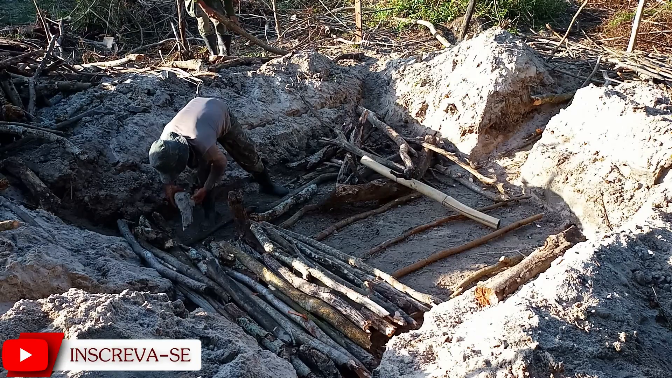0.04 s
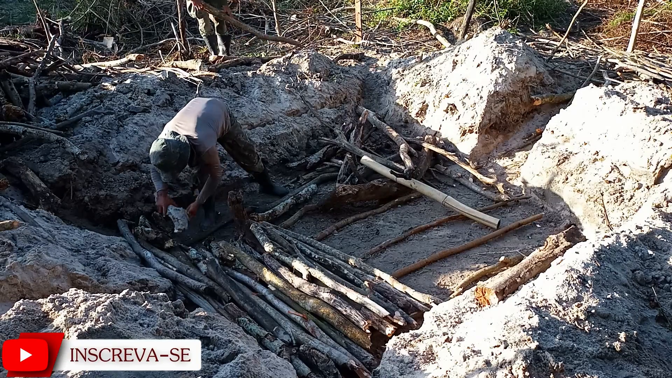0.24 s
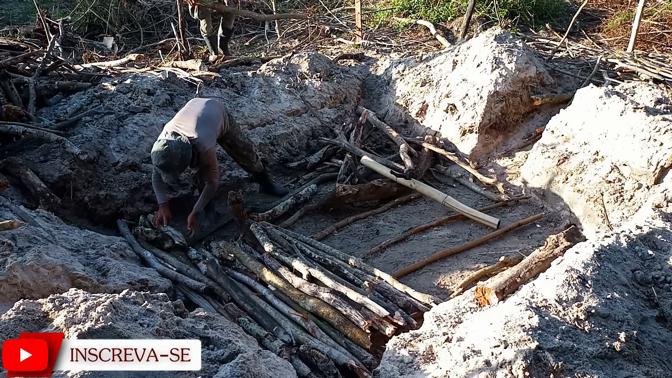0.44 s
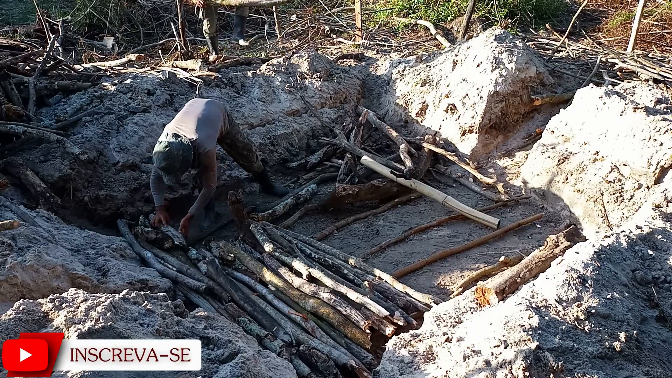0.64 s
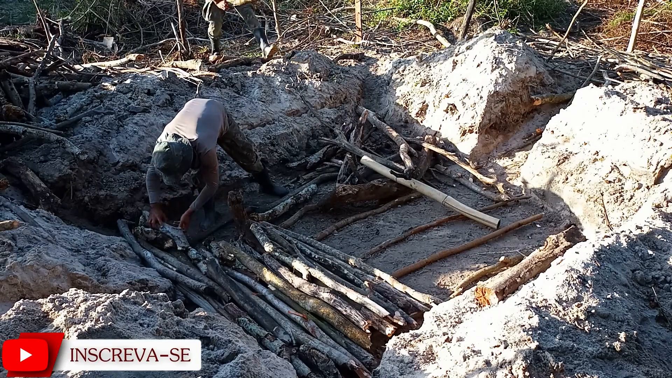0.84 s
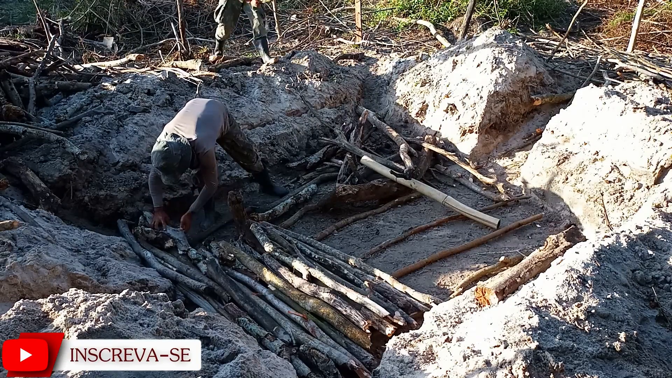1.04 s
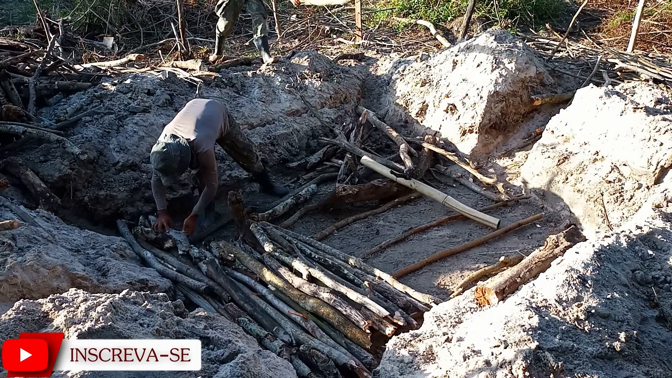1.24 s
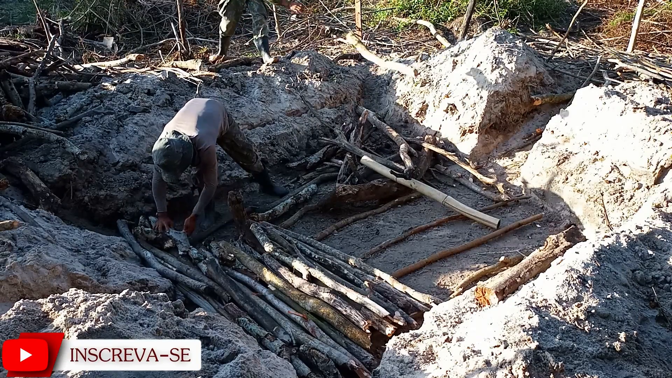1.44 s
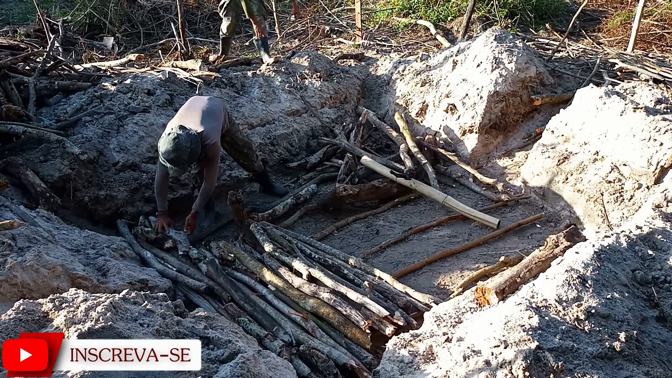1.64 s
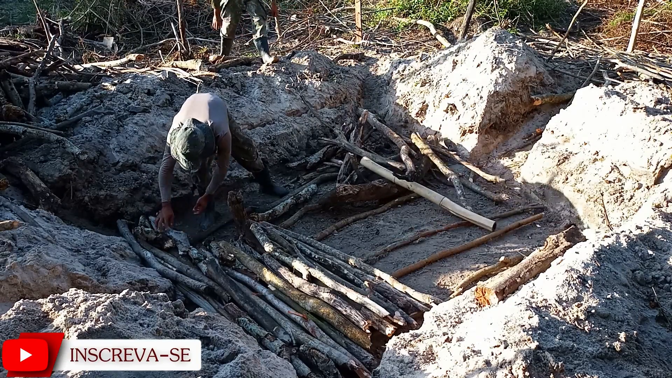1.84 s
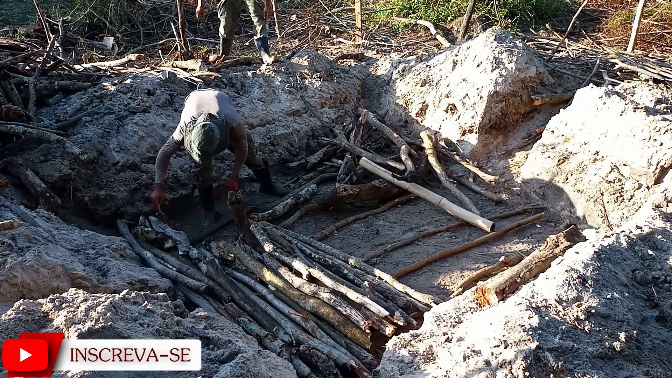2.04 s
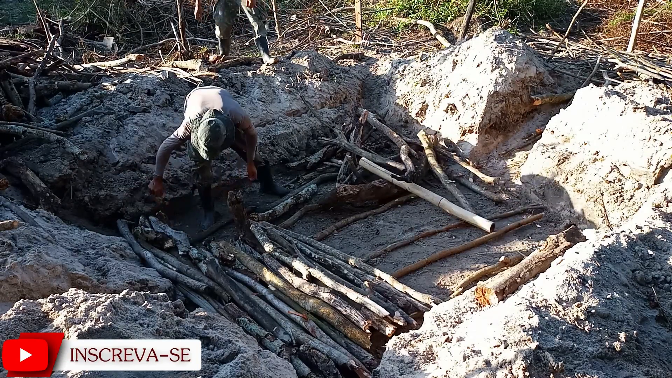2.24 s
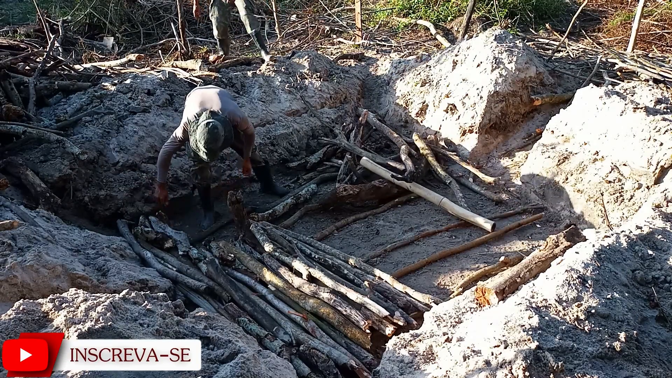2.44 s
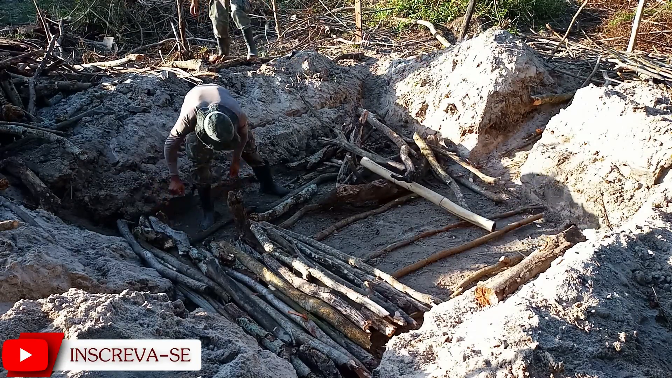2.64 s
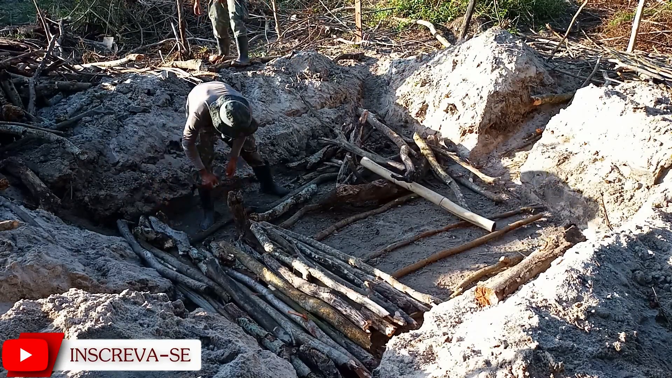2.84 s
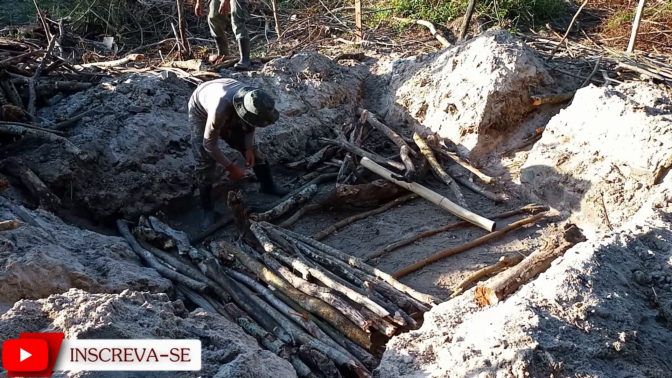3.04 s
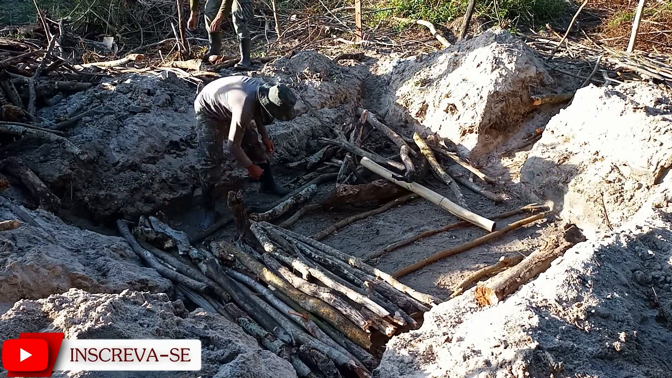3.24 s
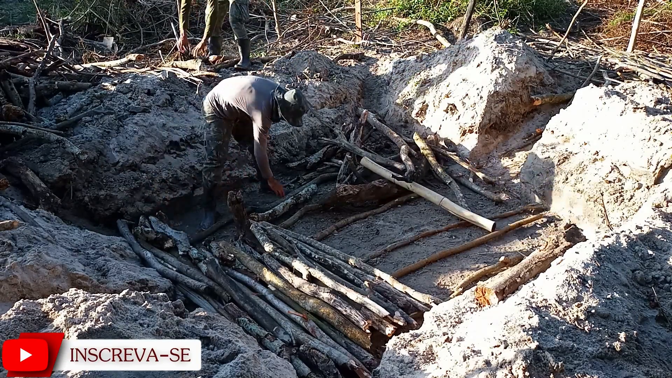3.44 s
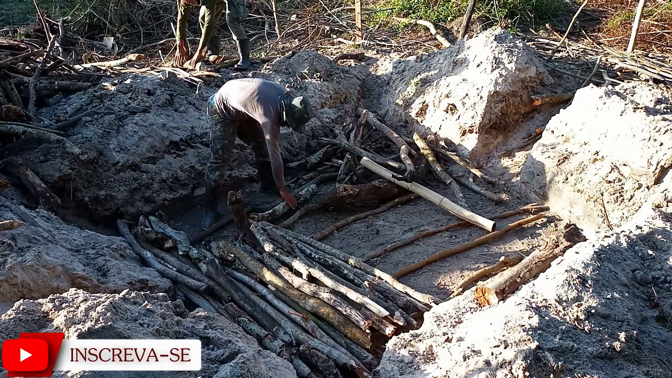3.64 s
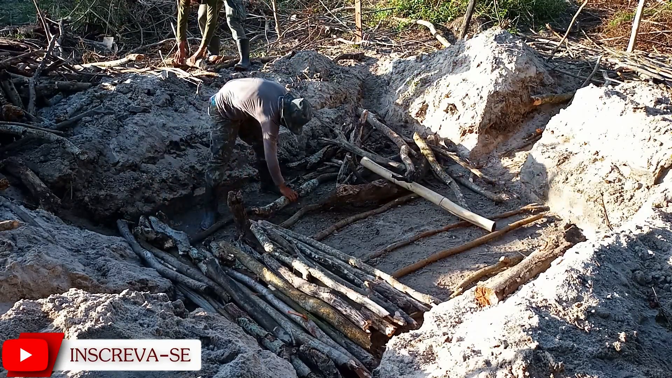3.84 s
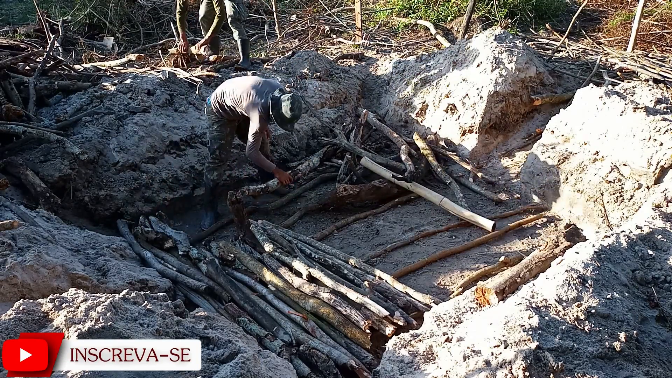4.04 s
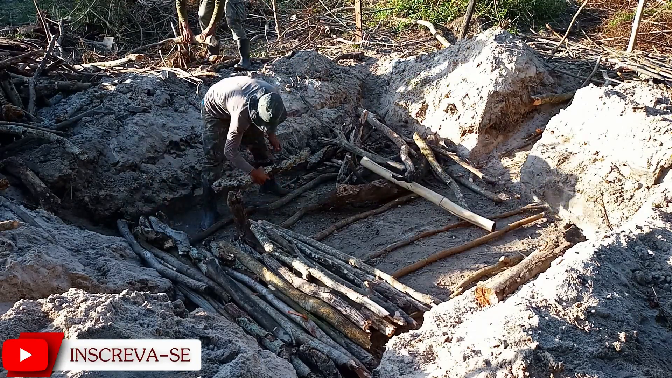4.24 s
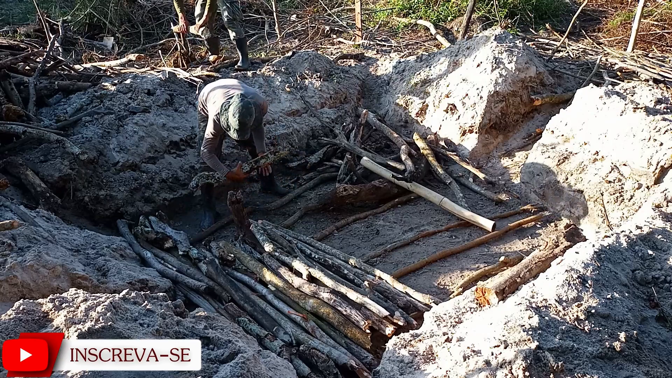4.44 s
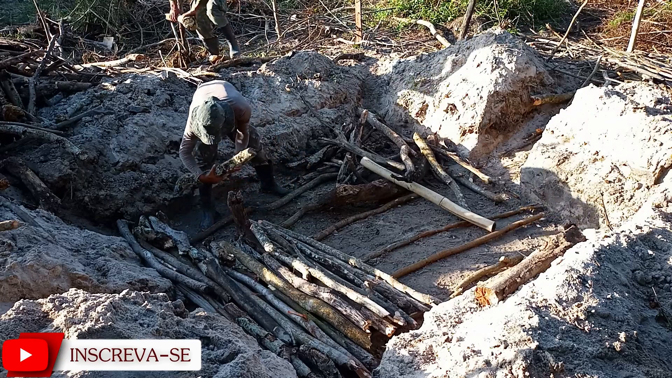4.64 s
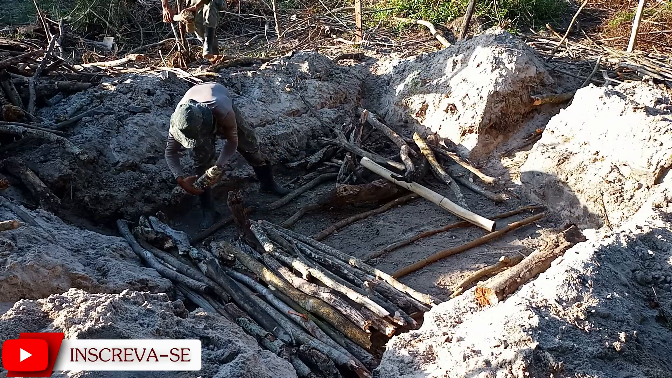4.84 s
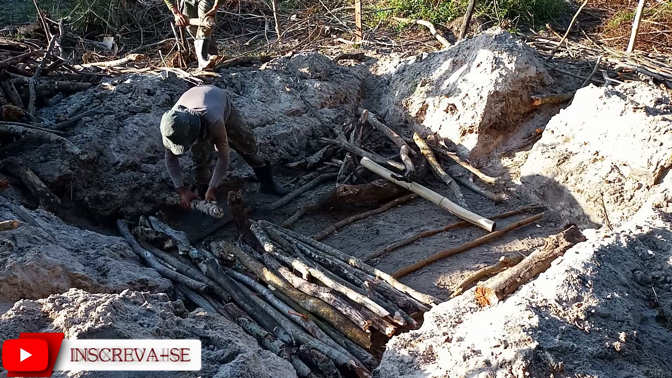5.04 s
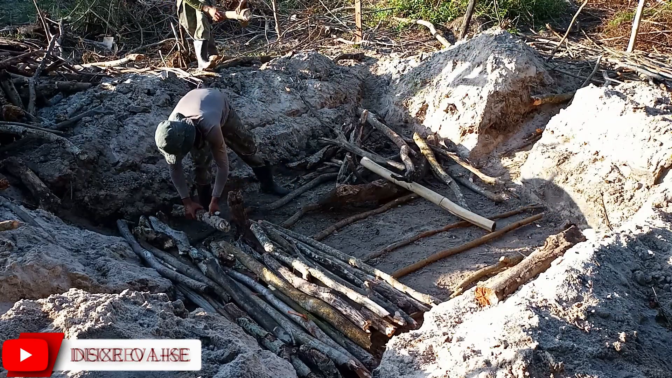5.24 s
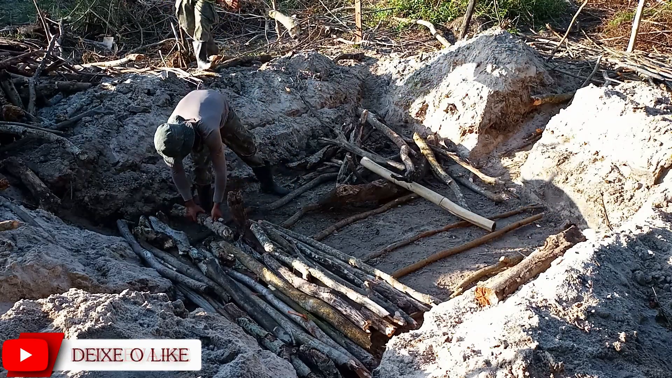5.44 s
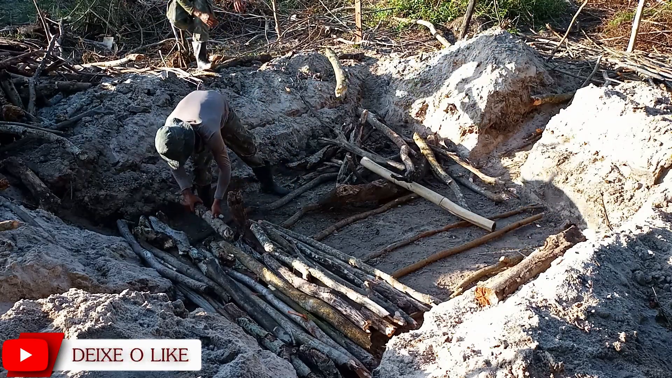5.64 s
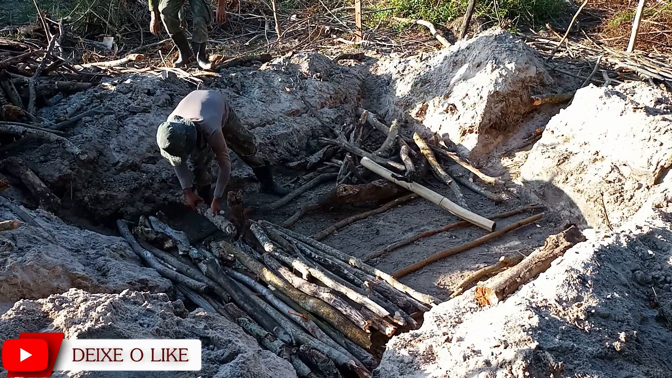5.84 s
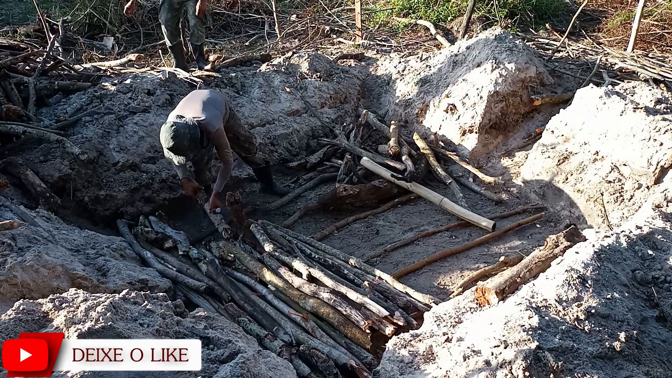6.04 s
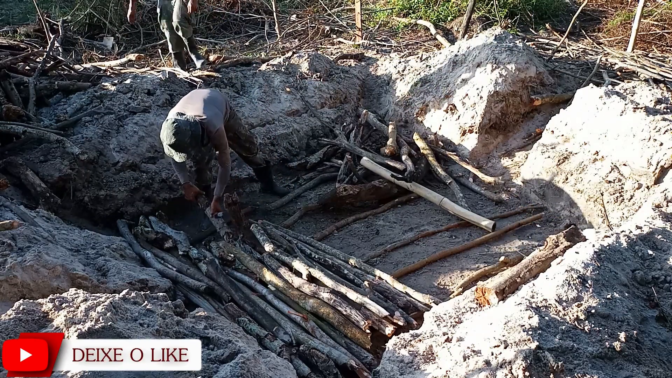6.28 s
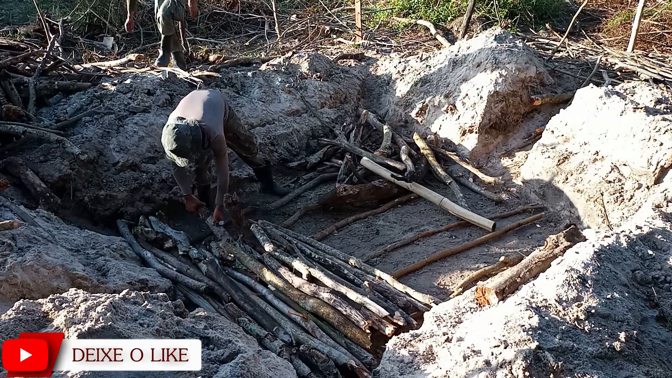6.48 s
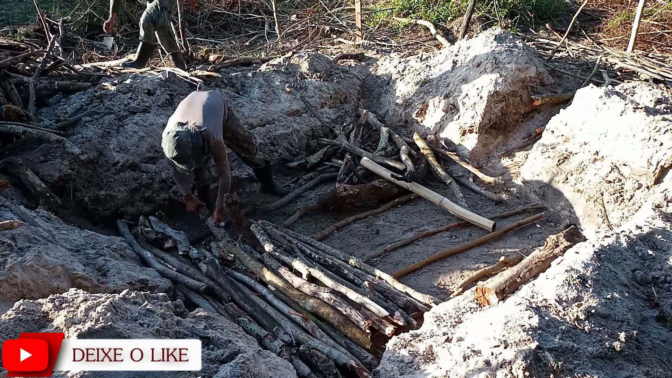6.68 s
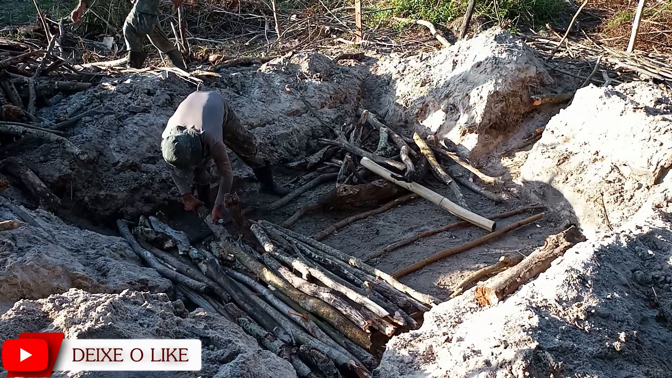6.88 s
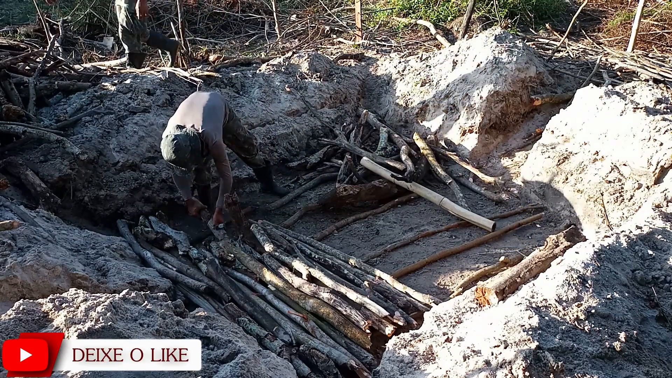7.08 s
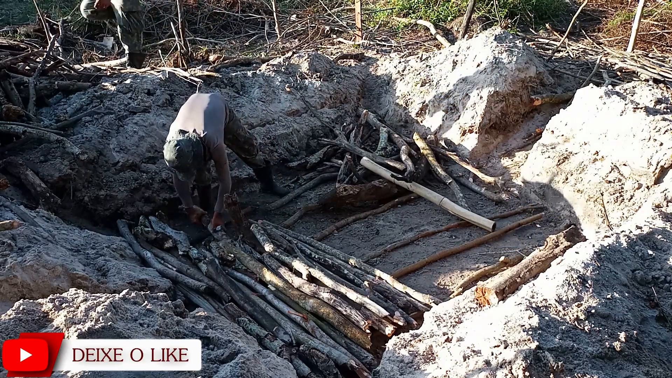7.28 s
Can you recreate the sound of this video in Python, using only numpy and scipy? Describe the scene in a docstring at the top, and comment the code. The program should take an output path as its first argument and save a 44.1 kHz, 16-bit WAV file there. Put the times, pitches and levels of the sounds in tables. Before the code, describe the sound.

Wood is piled by hand in two short, hollow clatters, between soft rustles and twig snaps, with faint birds behind.

```python
"""A faint scrape of bark over a far, low rush, then the first knock: firewood is stacked by hand in an
earth pit at the edge of a wood, a few metres away. Pieces knock, bounce and settle, each ringing in its
own modes, and the heavy ones thump the ground. Bark crunches at each contact and rustles as wood is
shifted; leaves and sand are trodden and dry twigs snap. The pit walls add a short wash and the trees a
faint echo. Small birds whistle through the foliage above a thin insect hiss."""
import sys
import numpy as np
from scipy import signal
from scipy.fft import rfft, irfft, next_fast_len
from scipy.io import wavfile
from scipy.ndimage import uniform_filter1d

SR = 44100
rng = np.random.default_rng(int(sys.argv[2]) if len(sys.argv) > 2 else 0)


def wrap_up_sound(samples):
    """Save the sound to the file named by the first command line argument, as 16-bit audio."""
    columns = np.atleast_2d(samples).T
    # keep every value between -1 and 1, then stretch to whole-number steps
    tamed = np.clip(columns, -1, 1)
    steps = np.round(tamed * 32767).astype(np.int16)
    wavfile.write(sys.argv[1], SR, steps)


N = 322371
TIME = np.arange(N) / SR

# modes of each piece of wood: f/Hz, level/dB, t60/s
WOOD_MODES = { "log": [(242, -7, 0.27), (295, -4.5, 0.18), (362, -4, 0.073), (451, -7, 0.087),
              (573, 1.5, 0.079), (621, 2, 0.062), (685, 0.5, 0.044), (780, -5.5, .055), (921, -4.5, 0.083),
              (1117, -7, 0.05), (1340, -7.5, 0.05), (1650, -11, 0.054), (1920, -7, 0.05),
              (2450, -9.5, .055)], "pile": [(234, -13.5, 0.083), (277.5, 1.5, 0.13), (383, 2, 0.09),
              (451, 2.5, 0.076), (523, 0.5, 0.05), (614, -1, 0.083), (750, -5.5, 0.067), (850, -4, 0.073),
              (1160, -11, 0.06), (1560, -15, 0.045)], "stump": [(345, -3, 0.15), (423, -6, 0.038),
              (487, 10, 0.069), (540, -6, 0.088), (960, -36, 0.035)], "billet": [(494, 0, 0.086),
              (678, -0.5, 0.074), (992, 2, 0.036), (1040, -9, 0.073), (1270, 4, 0.017), (1655, -6, 0.047),
              (2750, -16, 0.07), (3920, -5, 0.027), (4420, -37, .04)], "split": [(380, -3, 0.069),
              (587, -18, 0.049), (740, 2.5, 0.044), (940, 3.5, 0.039), (1194, -6, 0.069), (1570, -7, 0.055),
              (1813, -2, 0.024), (2400, -27, 0.013), (2630, -12, 0.029)], "stick": [(754, -2.5, 0.11),
              (1070, -7, 0.078), (1660, -9, 0.048), (1950, 9, 0.019), (2170, -20, 0.015), (2843, 7, 0.05),
              (3100, 2, 0.033), (4400, -21, 0.027), (4970, -18, 0.014), (5620, 18, 0.0053),
              (6130, -13, 0.033)], "stub": [(1135, 8, 0.045), (1246, 7, 0.066), (1624, 4, 0.044),
              (2030, -5, .025), (2600, 5, 0.022)], "branch": [(944, 1.5, 0.17), (1090, 0, 0.16),
              (1200, -1, 0.053), (1997, 5.5, 0.049), (2070, -6, 0.067), (3100, 3, 0.056), (4000, -17, .045),
              (4720, 1, 0.068), (5400, 6.5, 0.024), (6960, 1, 0.03)], }
# how each piece lies and what covers it: ring length/ratio, crack tilt/dB per octave, knock vs ring/dB
PIECES = {"log": (1, -0.39, -6), "pile": (1, 0, 0.5), "stump": (0.96, 0.87, -24),
          "billet": (0.54, -0.68, -11), "split": (0.71, -2.3, -6), "stick": (0.75, -2.6, -12.5),
          "stub": (0.83, -5, -22), "branch": (0.53, -1.8, -15.5)}
# wood meets wood: t/s, piece, ring level/dB, bark crack level/dB, crack decay/s
BLOWS = [ (0.4904, "billet", -47, -45.5, 0.0045), (0.495, "billet", -36.5, -36.5, 0.0071),
         (0.4982, "billet", -36, -36, 0.0018), (0.5006, "billet", -29.5, -54, .003),
         (0.524, "pile", -52, -64, .003), (0.937, "branch", -71, -54.5, 0.0017),
         (0.9534, "stick", -67, -52.5, 0.0076), (.982, "split", -48.5, -58, 0.0025),
         (1.1996, "stub", -43, -50.5, 0.0035), (1.344, "pile", -52, -59, .005),
         (1.352, "split", -47, -46.5, 0.0024), (1.357, "split", -32.5, -62, 0.0058),
         (1.7515, "stick", -24, -25.5, 0.0055), (1.7798, "log", -16.5, -35, 0.0073),
         (1.783, "split", -23.5, -25, 0.0053), (1.804, "log", -28.5, -29.5, 0.0075),
         (1.8133, "stub", -36, -32.5, 0.0054), (1.8232, "log", -22.5, -32.5, 0.0065),
         (1.826, "billet", -29, -28.5, 0.0051), (1.8342, "log", -22, -32.5, 0.0054),
         (1.841, "split", -35.5, -33.5, 0.0083), (1.863, "stub", -37, -36.5, 0.0039),
         (1.8825, "stick", -39, -39.5, 0.0062), (1.8898, "pile", -40.5, -50, .004),
         (1.897, "log", -51, -41.5, 0.0025), (1.934, "log", -52, -40.5, 0.014),
         (1.941, "stub", -60, -44.5, 0.0057), (1.951, "stick", -64.5, -53, 0.0048),
         (2.0355, "stub", -37.5, -45, 0.0038), (2.0943, "branch", -36.5, -43, 0.0033),
         (2.0981, "branch", -33.5, -38.5, 0.0064), (2.299, "pile", -68, -54, 0.0038),
         (5.462, "stump", -40.5, -73, .0034), (5.948, "pile", -40, -38, 0.005),
         (5.9544, "branch", -27, -23.5, 0.0063), (5.9728, "split", -26, -34.5, 0.0039),
         (5.9985, "pile", -35.5, -40.5, 0.0048), (6.002, "pile", -22, -50, 0.006),
         (6.0148, "pile", -27.5, -56, .005), (6.037, "pile", -41.5, -60, .004),
         (6.086, "stub", -47, -48, 0.013), (6.685, "log", -48.5, -60.5, 0.016),
         (7.082, "split", -48.5, -58, 0.0041), ]
# heavy pieces come down on the earth: t/s, peak level/dB
LANDINGS = [(0.4976, -37), (1.353, -42.5), (1.781, -20), (1.819, -30), (1.882, -31), (5.9543, -33),
            (6.002, -48)]
# bark drags, leaves and sand are trodden: peak t/s, half length/s, surface, crackle level/dB
SCUFFS = [ (0.096, 0.037, "bark", -66.5), (0.606, 0.0095, "leaves", -55), (0.674, 0.022, "leaves", -54),
          (1.012, 0.029, "earth", -51), (1.183, 0.015, "leaves", -58), (1.33, 0.0095, "leaves", -52.5),
          (1.357, 0.022, "bark", -52.5), (1.491, 0.014, "bark", -59.5), (1.868, 0.05, "leaves", -42.5),
          (1.962, 0.05, "bark", -51), (2.517, 0.11, "bark", -65.5), (3.365, 0.049, "sand", -61),
          (3.475, 0.023, "sand", -62.5), (3.804, 0.044, "leaves", -56.5), (4.679, 0.13, "sand", -68.5),
          (4.848, 0.054, "leaves", -61.5), (4.986, 0.082, "leaves", -61), (5.086, 0.025, "sand", -56.5),
          (5.201, 0.061, "bark", -60), (5.736, 0.031, "bark", -64), (5.967, 0.011, "bark", -32),
          (6.163, 0.22, "leaves", -64), (6.337, 0.033, "leaves", -61), (6.438, 0.039, "bark", -60.5),
          (6.553, 0.032, "leaves", -53), (6.655, 0.023, "bark", -52.5), (6.782, 0.05, "bark", -62.5),
          (6.973, 0.036, "bark", -59), (7.135, 0.071, "bark", -58.5), (7.267, 0.02, "bark", -51.5), ]
# tone of each rubbed surface: crackle tilt/dB per octave, wood body vs crackle/dB
SURFACES = {"bark": (-1.15, -7), "leaves": (3, -9), "sand": (3.9, 0.42), "earth": (-1.8, 1)}
# dry twigs break: t/s, level/dB, decay/s
SNAPS = [(1.008, -54, 0.0016), (1.168, -67, 0.0023), (1.324, -58, 0.0045), (2.299, -56.5, 0.0041),
         (2.5385, -56.5, 0.0017), (3.772, -55, 0.0075), (3.7865, -32.5, 0.00095), (4.624, -65.5, 0.00087),
         (4.703, -68, .0007), (4.78, -62.5, 0.0017), (4.953, -73, 0.0019), (5.079, -58, 0.00082),
         (5.185, -68, 0.0014), (5.284, -67, 0.0025), (5.719, -63.5, .002), (6.14, -38.5, 0.006),
         (6.2579, -43, 0.0041), (6.329, -63, 0.0019), (6.5072, -51, 0.0014), (6.531, -53, 0.00053),
         (6.5522, -45.5, 0.0026), (6.644, -51.5, 0.0044), (6.953, -61.5, 0.0057), (7.123, -50.5, 0.0073),
         (7.251, -62, 0.0066)]
# the nearer birds: t/s, length/s, note shape, middle f/Hz, level/dB
CHIRPS = [ (0.823, 0.085, "slur", 3250, -62), (1.028, 0.1, "hook", 3850, -50.5),
          (1.355, 0.085, "hook", 3950, -49.5), (1.421, 0.11, "level", 4520, -61.5),
          (1.462, 0.052, "slide", 3150, -61), (1.51, 0.11, "level", 3940, -66),
          (1.535, 0.061, "slide", 2980, -71), (1.649, 0.088, "slur", 3330, -52.5),
          (2.477, 0.015, "pip", 3030, -52), (2.606, 0.016, "pip", 5900, -60),
          (2.71, 0.031, "pip", 2710, -62), (2.807, 0.021, "pip", 2750, -60), (2.904, .02, "pip", 2740, -67),
          (3.026, 0.061, "drop", 5300, -65), (3.087, 0.035, "drop", 4600, -57.5),
          (3.171, 0.039, "sweep", 2580, -55.5), (3.646, 0.1, "level", 3770, -57.5),
          (3.921, 0.042, "level", 3780, -50.5), (3.99, 0.068, "rise", 3960, -58),
          (4.022, 0.13, "rise", 6300, -57), (4.211, 0.43, "level", 3080, -70.5),
          (4.364, 0.035, "level", 3540, -55), (4.537, 0.21, "rise", 3316, -62.5),
          (4.847, 0.055, "slide", 3100, -57), (5.184, 0.094, "slur", 3580, -61),
          (5.43, 0.21, "hook", 3760, -62.5), (5.886, 0.075, "arch", 3970, -47.5),
          (6.232, 0.088, "slur", 3330, -51), (6.401, 0.079, "slur", 3450, -56),
          (6.462, 0.17, "level", 2980, -60), (6.714, 0.075, "arch", 3920, -56.5),
          (6.758, 0.047, "slide", 3300, -57), ]
# bird note shapes: four pitches from start to end/ratio to the middle, share scattered by foliage/0-1
NOTE_SHAPES = { "slur": (1.04, 1.07, .93, .84, .6), "hook": (.94, 1.02, .98, .85, .8),
               "arch": (.89, .99, 1, .91, .55), "slide": (1.07, 1.02, .97, .93, .55),
               "level": (1.01, 1, 1, .98, .35), "rise": (.978, .993, 1.007, 1.018, .1),
               "sweep": (.95, .98, 1.02, 1.07, .4), "pip": (1, 1.02, 1.01, .96, .5),
               "drop": (1.07, 1.03, .97, .92, .4), }
# tone curves: f/Hz, level/dB
BODY_EQ = [(40, -47), (110, -41), (190, -12), (290, 0), (600, 9.5), (1100, -3), (1700, -10), (3000, -15),
           (8000, -41)]  # dull knock of wood
BARK_EQ = [(150, -33), (500, -7), (1200, 0.5), (2300, -2), (3500, 4), (5000, 0), (6500, -2), (8200, -12.5),
           (11000, -13), (14500, -10.5), (16000, -23)]  # bark being crushed
THUMP_EQ = [(15, -16), (50, -30), (100, -16), (170, -5.5), (250, -4), (400, 0.5), (1000, -23), (4000, -80)]  # shaken earth
RUSTLE_EQ = [(150, -29), (500, -4.5), (1200, -1), (2200, -5.5), (3200, 0.5), (4800, 0), (6500, -7.5),
             (8200, -11), (11500, -18.5), (15500, -19.5)]  # rubbed surfaces
TWIG_EQ = [(30, -95), (200, -43), (600, -16), (1000, -23), (1550, -8), (2100, -11.5), (3700, 3.5),
           (5500, -1), (8000, 0.5), (12000, -0.5), (14500, 2), (16000, -13)]  # a quick snap
ECHO_EQ = [(40, -30), (150, -9.5), (500, -3.5), (1500, -3), (4000, -1.5), (8000, -2.5), (15000, -1.5)]  # what the trunks throw back
AIR_EQ = [(20, -57), (45, -31), (80, -25), (140, -16), (240, -14), (330, -8), (480, 1.5), (610, -0.5),
          (760, -7.5), (1050, -9), (1400, -16.5), (2100, -23.5), (3500, -22), (5600, -23), (8500, -32),
          (15500, -35.5)]  # far rush and hiss
# fader ride of the far rush: t/s, level/dB
RUSH_RIDE = [(0, -56), (0.3, -58), (0.7, -55.5), (1.1, -59), (1.6, -57.5), (2.8, -60.5), (3.4, -58.5),
             (4.1, -57.5), (4.65, -56), (5.5, -58.5), (5.8, -54.5), (7.31, -56.5)]
# insect noise bands: f/Hz, width/Hz, relative level/dB
INSECT_BANDS = [(6580, 170, 4.5), (7330, 310, 0.5)]


def firewood(ground_db=-30, choke_s=0.0055, contact_s=0.0004):
    """Each blow knocks and rings a piece, crushes its bark and shakes the ground; heavy pieces land."""
    out, t = np.zeros(N), seconds(.25)
    contact = np.sin(np.pi * np.minimum(t / contact_s, 1))
    knock = unit_hit(colour(contact, BODY_EQ))
    for start, piece, ring_db, crack_db, crack_s in BLOWS:
        sustain, tilt_db, knock_db = PIECES[piece]
        # the ring is choked when the same piece makes its next contact
        free_s = min([row[0] - start for row in BLOWS if row[1] == piece and row[0] > start], default=1)
        choke = np.exp(-np.maximum(t - free_s, 0) / choke_s)
        ring = choke * wood_ring(WOOD_MODES[piece], t, sustain)
        body = ring + amp(knock_db) * knock + amp(ground_db) * ground_thump(t)
        crunch = fibre_crack(t, BARK_EQ, crack_s, tilt_db, split_db=-15)
        add(out, start, amp(ring_db) * body + amp(crack_db) * crunch)
    for start, db in LANDINGS:
        add(out, start, amp(db) * ground_thump(t))
    return out


def wood_ring(modes, t, sustain, detune=0.016, spot_db=2.0, rattle_db=-9.0, rattle_s=0.013):
    """A piece rings in a mix of modes set by where it is struck, and rattles against its neighbours."""
    hz, db, t60 = np.transpose(modes)
    tuning, spot, polarity = rng.standard_normal((len(hz), 3)).T
    waves = np.sin(2 * np.pi * np.outer(hz * (1 + detune * tuning), t))
    fades = np.exp(-np.log(1000) * np.outer(1 / (t60 * sustain), t))
    gains = np.sign(polarity) * amp(db + spot_db * spot)
    tones = unit_hit(gains @ (waves * fades))
    rattle = unit_hit(colour(noise_burst(t, rattle_s), BODY_EQ))
    # below its lowest mode a piece hardly radiates
    low_cut = signal.butter(3, 0.95 * hz[0], "high", fs=SR, output="sos")
    return signal.sosfilt(low_cut, tones + amp(rattle_db) * rattle)


def fibre_crack(t, eq, decay_s, tilt_db, split_db, attack_s=0.0012):
    """Dry fibres break in a short burst of grains, with one sharp split among them."""
    envelope = np.exp(-t / decay_s) * (1 - np.exp(-t / attack_s))
    crush = grains(len(t), spread_db=2.6, grain_s=.0004) * envelope
    click = signal.unit_impulse(len(t), int(attack_s * SR))
    split = amp(split_db) * np.linalg.norm(crush) * click
    return unit_hit(colour(crush + split, eq, tilt_db))


def ground_thump(t, shake_s=0.022, shake_db=-24):
    """One push into the ground and the dull shaking after it, peak 1."""
    push = signal.unit_impulse(len(t)) + amp(shake_db) * noise_burst(t, shake_s)
    thump = colour(push, THUMP_EQ)
    return thump / abs(thump).max()


def scuffs(grit_per_s=120, grit_db=1, grit_spread_db=3, catch_per_s=75, catch_db=3):
    """Rough surfaces catch and slip: an uneven swell of crackle and grit that stirs the wood beneath."""
    out, t = np.zeros(N), seconds(1)
    for peak_s, half_s, surface, db in SCUFFS:
        tilt_db, body_db = SURFACES[surface]
        slips = grains(SR, spread_db=0, grain_s=0.00065)
        grit_sizes = amp(grit_spread_db * np.minimum(rng.exponential(size=SR), 2))
        grit_signs = rng.choice([-1, 1], SR)
        grit = unit((rng.random(SR) < grit_per_s / SR) * grit_sizes * grit_signs)
        catching = unit(amp(catch_db * drift(catch_per_s, t)))
        crackle = unit(colour(catching * slips + amp(grit_db) * grit, RUSTLE_EQ, tilt_db))
        body = amp(body_db) * unit(colour(slips, BODY_EQ))
        lead_s = min(peak_s, .5)
        swell = bell(t, lead_s, 0.98 * half_s)
        add(out, peak_s - lead_s, amp(db) * swell * (crackle + body))
    return out


def twig_snaps(ring_db=-23, quick_s=0.00079):
    """A twig gives way and barely rings; the quicker it goes, the brighter and more like one click."""
    out, t = np.zeros(N), seconds(.25)
    for start, db, decay_s in SNAPS:
        slowness = np.log2(decay_s / quick_s)
        fibres = fibre_crack(t, TWIG_EQ, decay_s, tilt_db=-0.5 - 2.5 * slowness, split_db=2 - 7 * slowness)
        ring = amp(ring_db) * wood_ring(WOOD_MODES["stick"], t, sustain=1)
        add(out, start, amp(db) * (fibres + ring))
    return out


def pit_walls(x, wall_db=-10, fade_s=0.014, gap_s=.002):
    """The direct sound plus a dense wash of early reflections off the rough earth walls."""
    t = seconds(.06)
    reflections = noise_burst(t, fade_s) * (t > gap_s)
    return x + amp(wall_db) * reverb(x, reflections)


def tree_echo(x, t60, patchy_db, build_s=0.019):
    """Trunks scatter the sound back as a soft-edged, grainy tail."""
    t = seconds(1)
    envelope = np.exp(-np.log(1000) * t / t60) * (1 - np.exp(-t / build_s))
    tail = grains(SR, patchy_db, grain_s=0.0039) * envelope
    return reverb(x, colour(tail, ECHO_EQ))


def near_birds(echo_db=-1.5, blur_share=.6):
    """Part of each call arrives clear; the rest is blurred by foliage and echoes in the trees."""
    clear, hidden = np.zeros(N), np.zeros(N)
    for start, length_s, shape, hz, db in CHIRPS:
        call = amp(db) * whistle(length_s, shape, hz)
        scattered = NOTE_SHAPES[shape][-1]
        add(clear, start, np.sqrt(1 - scattered) * call)
        add(hidden, start, np.sqrt(scattered) * call)
    # fast flutter smears the pitch into a narrow band of noise
    flutter = unit(uniform_filter1d(uniform_filter1d(rng.standard_normal(N), size=70), size=45))
    hidden *= np.sqrt(1 - blur_share) + np.sqrt(blur_share) * flutter
    return clear + foliage(hidden) + amp(echo_db) * tree_echo(hidden, t60=1.0, patchy_db=0)


def far_birds(calls_per_s=4, low_hz=2800, high_hz=5000, length_s=.07, db=-73):
    """Faint whistles from deep in the wood, at chance times and pitches."""
    out, shapes = np.zeros(N), list(NOTE_SHAPES)
    for slot, (offset, pitch, kind) in enumerate(rng.random((30, 3))):
        hz = low_hz * (high_hz / low_hz) ** pitch
        shape = shapes[int(kind * len(shapes))]
        add(out, (slot + offset) / calls_per_s, amp(db) * whistle(length_s, shape, hz))
    return out


def whistle(length_s, shape, middle_hz, waver=0.011):
    """One bird note: a pure tone that bends through four pitches and wavers."""
    progress = np.linspace(0, 1, int(length_s * SR))
    contour = np.polyfit(np.linspace(0, 1, 4), NOTE_SHAPES[shape][:4], 3)
    wobble = unit(uniform_filter1d(rng.standard_normal(SR), size=110))[:len(progress)]
    hz = middle_hz * np.polyval(contour, progress) * (1 + waver * wobble)
    swell = np.sqrt(4 * progress * (1 - progress)) * (1 - progress / 2)
    return swell * np.sin(2 * np.pi * np.cumsum(hz) / SR)


def foliage(x, fade_s=0.0097):
    """Leaves scatter a call over many short paths and blur it."""
    return reverb(x, noise_burst(seconds(.1), fade_s))


def far_rush(swell_db=1.5, swell_per_s=8, flicker_db=6.0, flicker_per_s=14, hiss_db=-60.5):
    """A low bed of noise: octaves swell, sixth-octave bands flicker, and a hiss wavers around them."""
    air = rfft(unit(colour(rng.standard_normal(N), AIR_EQ)), 2 * next_fast_len(N // 2 + 1))
    hz = np.maximum(np.linspace(0, SR / 2, len(air)), 1)
    rush, outside_bands = np.zeros(N), np.ones(len(hz))
    for octave in range(5):
        swell = swell_db * drift(swell_per_s)
        for centre_hz in 170 * 2 ** (octave + np.arange(6) / 6):
            band = np.maximum(1 - 6 * abs(np.log2(hz / centre_hz)), 0)
            outside_bands -= band
            movement = unit(amp(swell + flicker_db * drift(flicker_per_s)))
            rush += irfft(air * band)[:N] * movement
    hiss = amp(hiss_db + 1.2 * drift(per_s=5)) * irfft(air * outside_bands)[:N]
    ride = amp(np.interp(TIME, *np.transpose(RUSH_RIDE)))
    return ride * rush + hiss


def insects(gain_db=-79):
    """Insects hiss steadily in two thin, high bands."""
    return amp(gain_db) * sum(amp(db) * noise_band(hz, width) for hz, width, db in INSECT_BANDS)


def passing_rumble(start_s=2.84, end_s=4.14, fade_s=0.17, db=-74.5):
    """A faint, low rumble fades in, holds and fades out."""
    fade = np.clip(np.minimum(TIME - start_s, end_s - TIME) / fade_s, 0, 1)
    return amp(db) * fade * noise_band(centre_hz=161, width_hz=44)


def amp(db):
    """Decibels to gain."""
    return 10 ** (np.asarray(db) / 20)


def seconds(length_s):
    """A time axis of the given length."""
    return np.arange(int(length_s * SR)) / SR


def unit(x):
    """Scale to rms 1."""
    return x / np.sqrt(np.mean(x ** 2))


def unit_hit(x):
    """Scale to rms 1 over the first 8 ms."""
    return x / np.sqrt(np.mean(x[:int(.008 * SR)] ** 2))


def add(out, start_s, x):
    """Mix x in at the given time."""
    i = max(int(start_s * SR), 0)
    out[i:i + len(x)] += x[:max(N - i, 0)]


def bell(x, centre, width):
    """A Gaussian hump, peak 1."""
    return np.exp(-.5 * ((x - centre) / width) ** 2)


def colour(x, eq, tilt_db=0, size=2048):
    """Shape x with a tone curve, tilted in dB per octave."""
    hz, db = np.transpose(eq)
    octave = np.log2(np.maximum(np.fft.rfftfreq(size, 1 / SR), 1))
    tilt = tilt_db * np.clip(octave, np.log2(hz[0]), np.log2(hz[-1]))
    gain_db = np.interp(octave, np.log2(hz), db) + tilt
    # minimum phase keeps attacks sharp, with no ringing ahead of them
    cepstrum = irfft(np.log(amp(gain_db - gain_db.max())))
    cepstrum[1:size // 2] *= 2
    cepstrum[size // 2 + 1:] = 0
    return signal.fftconvolve(x, irfft(np.exp(rfft(cepstrum))))[:len(x)]


def reverb(x, response):
    """Play x through an impulse response scaled to unit energy."""
    return signal.fftconvolve(x, response / np.linalg.norm(response))[:N]


def grains(n, spread_db, grain_s):
    """Noise in tiny grains: the wider their spread in level, the more it crackles."""
    hold = max(int(grain_s * SR), 1)
    sizes = amp(spread_db * np.minimum(rng.exponential(size=n // hold + 1), 5))
    return unit(np.repeat(sizes, hold)[:n] * rng.standard_normal(n))


def noise_burst(t, decay_s):
    """White noise that dies away."""
    return rng.standard_normal(len(t)) * np.exp(-t / decay_s)


def noise_band(centre_hz, width_hz):
    """Noise in one narrow band, rms 1."""
    band = bell(np.fft.rfftfreq(N, 1 / SR), centre_hz, width_hz)
    return unit(irfft(band * rfft(rng.standard_normal(N)), N))


def drift(per_s, t=TIME):
    """A control curve gliding between random values, with a spread near 1."""
    knots = rng.standard_normal(200)
    return np.interp(t * per_s, np.arange(len(knots)), knots)


def scene(wood_echo_db=-19.5, snap_echo_db=-15, far_echo_db=7.0):
    """Wood in the pit up front, birds through foliage behind, both echoing over the far bed; mono."""
    twigs, far_calls = twig_snaps(), far_birds()
    near = pit_walls(firewood() + scuffs() + twigs)
    outward = firewood() + scuffs()  # the pieces radiate a different mix towards the trees
    echo = amp(wood_echo_db) * tree_echo(outward, t60=1.0, patchy_db=3)
    echo += amp(snap_echo_db) * tree_echo(twigs, t60=0.29, patchy_db=1)
    birds = near_birds() + foliage(far_calls)
    birds += amp(far_echo_db) * tree_echo(far_calls, t60=0.91, patchy_db=2)
    bed = far_rush() + insects() + passing_rumble()
    return (near + echo + birds + bed)[None]


def record(dry):
    """A steep high cut at 16.1 kHz takes off the very top."""
    return signal.sosfilt(signal.ellip(10, .1, 70, 16100, fs=SR, output="sos"), dry)


dry = scene()
out = record(dry)
wrap_up_sound(out)
```